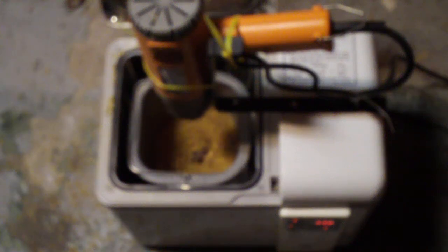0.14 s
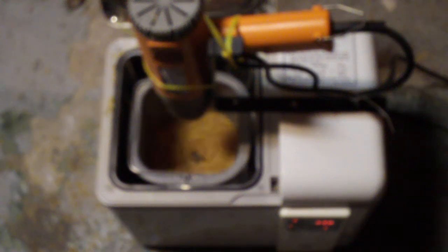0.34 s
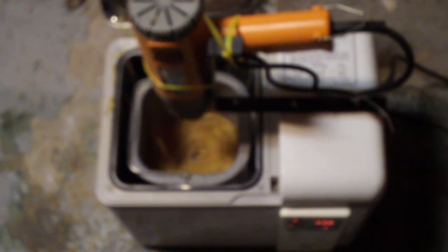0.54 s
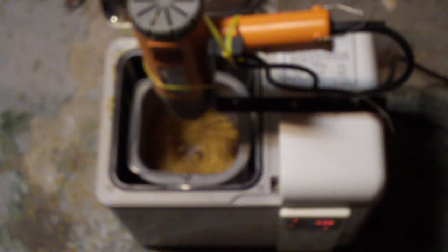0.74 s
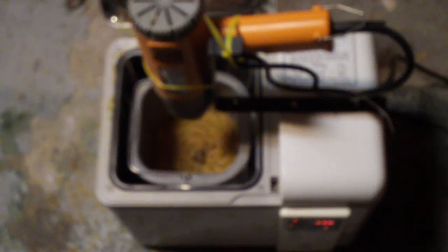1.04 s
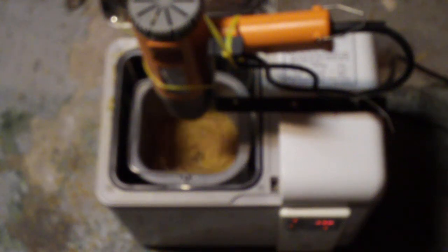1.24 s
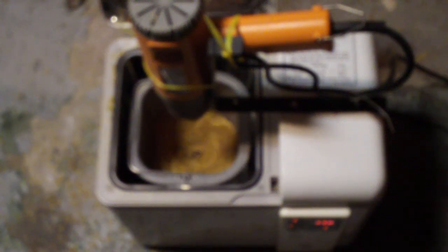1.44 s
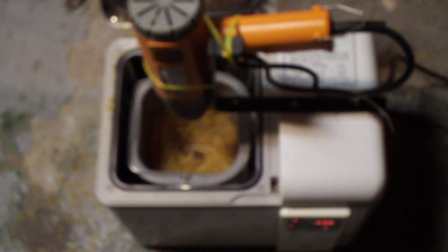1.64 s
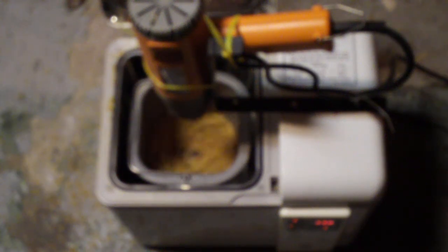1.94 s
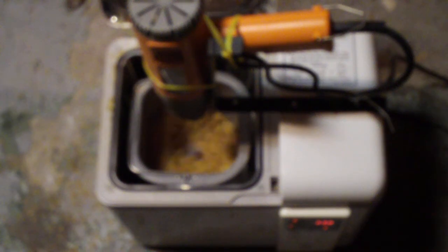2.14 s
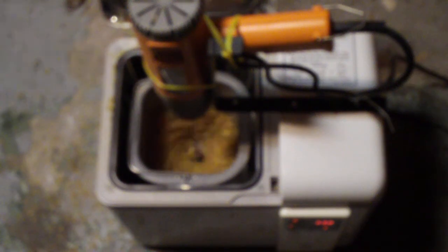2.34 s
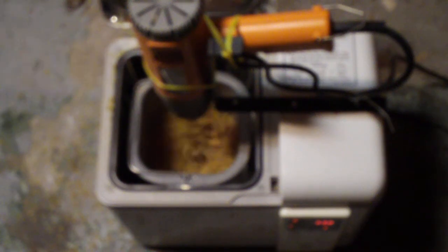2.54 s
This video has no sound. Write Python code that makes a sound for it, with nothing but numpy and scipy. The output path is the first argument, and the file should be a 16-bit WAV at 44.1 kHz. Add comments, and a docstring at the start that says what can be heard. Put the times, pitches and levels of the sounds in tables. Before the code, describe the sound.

Beans tumble in a metal pan without pause for about 2.7 seconds, a dense bright rattle with uneven surges several times a second. Harder knocks stand out near 0.55, 0.87, 1.7 and 2.3 seconds, among small metallic pings. Beneath, a heat gun blows a steady, slightly hollow rush with a fluttering high fan whine, over a faint low motor hum. Close, dry, centred sound.

```python
"""At the pan of a bread machine: a heat gun blows in while the paddle stirs a load of beans.
Beans rattle all the time and spill against the metal in quick uneven surges: random hits that ring.
Hard knocks are decaying noise bursts; stray hits ping the pan's modes.
The gun's air is coloured noise with hollow resonances, its fan a whine of fluttering harmonics.
The stirring motor hums at twice the mains rate and the octave above."""
import sys
import numpy as np
from scipy import signal
from scipy.fft import rfft, irfft
from scipy.io import wavfile

SR = 44100
rng = np.random.default_rng(int(sys.argv[2]) if len(sys.argv) > 2 else 0)


def wav_record(signal):
    """Record a signal, one row per channel, as 16-bit PCM in the file named by sys.argv[1]."""
    frames = np.transpose(np.atleast_2d(signal))
    bounded = np.clip(frames, -1, 1)
    # unit amplitude maps onto the largest positive 16-bit level
    quanta = np.round(bounded * 32767).astype(np.int16)
    wavfile.write(sys.argv[1], SR, quanta)


N = 119070

# Colour of beans on the pan. Each row: frequency in Hz, relative density in dB per Hz.
CLATTER_SPECTRUM = [(300, -22), (1000, -11), (1600, -3), (2800, -0.5), (3300, 1.5), (4100, 1), (4500, 5),
                    (4900, -5.5), (5400, 4), (5650, -6), (5900, 4.5), (6300, 0.5), (7200, 2), (9000, -5),
                    (15000, -40)]


def from_db(db):
    """Decibels to amplitude gain."""
    return 10 ** (np.asarray(db) / 20)


def rms_one(x):
    """Scale to unit rms."""
    return x / np.sqrt(np.mean(x ** 2) + 1e-20)


def in_time(rows):
    """Join (seconds, value) points by straight lines."""
    return np.interp(np.arange(N) / SR, *np.transpose(rows))


def drift(rate_hz):
    """Random wander of unit rms: noise low-passed to -6 dB at rate_hz."""
    hz = np.arange(N // 2 + 1) * SR / N
    spectrum = rfft(rng.standard_normal(N)) / (1 + (hz / rate_hz) ** 2)
    return rms_one(irfft(spectrum, N))


def coloured(x, spectrum):
    """Filter x by (Hz, dB) points joined over log frequency; unit rms."""
    hz, db = np.transpose(spectrum)
    bins_hz = np.maximum(np.arange(N // 2 + 1) * SR / N, 1)
    gain = from_db(np.interp(np.log(bins_hz), np.log(hz), db))
    return rms_one(irfft(rfft(x) * gain, N))


def blown(hz, width_hz):
    """Turbulence passed twice through one resonance; unit rms."""
    # each pass is wider by pi/2, so the pair is about width_hz wide at half power
    b, a = signal.iirpeak(hz, hz / (np.pi / 2 * width_hz), fs=SR)
    noise = rng.standard_normal(N + SR)
    resonant = signal.lfilter(b, a, signal.lfilter(b, a, noise))
    return rms_one(resonant[SR:])   # drop the build-up


def rattle(power, hits_per_s, spectrum):
    """Random bean hits, denser as the power rises, each ringing briefly in the pan."""
    hit_spread_db, pan_t60_s, pan_ring_db = 2.5, 0.035, -1
    born = rng.random(N) < hits_per_s * power / power.mean() / SR
    strength_db = hit_spread_db * np.minimum(rng.exponential(1, N), np.pi)
    hits = born * from_db(strength_db) * rng.choice([-1, 1], N)
    t = np.arange(SR // 10) / SR
    spots = 10
    dealt = rng.integers(0, spots, N)
    ringing = 0
    for spot in range(spots):   # every spot of the pan rings differently
        tail = rng.standard_normal(len(t)) * np.exp(-np.log(1000) * t / pan_t60_s)
        tail = tail / np.linalg.norm(tail)
        ringing = ringing + signal.fftconvolve(hits * (dealt == spot), tail)[:N]
    return np.sqrt(power.mean()) * coloured(hits + from_db(pan_ring_db) * ringing, spectrum)


def beans():
    """A steady tumble plus surges of hits that swell quickly and die away more slowly."""
    # Each row: peak in seconds, length in seconds, clatter and crackle in dB before the surge trims.
    surges = [(0.044, 0.036, -21, -21.5), (0.08, 0.022, -21, -23), (0.111, 0.024, -20.5, -18),
              (0.161, 0.016, -19.5, -19), (0.336, 0.013, -20, -13), (0.391, 0.011, -22, -27),
              (0.436, 0.029, -22, -22), (0.54, 0.025, -19.5, -23), (0.57, 0.014, -23, -24),
              (0.637, 0.023, -17, -19.5), (0.76, 0.023, -18, -19.5), (0.786, 0.02, -20.5, -37),
              (0.833, 0.025, -19.5, -20.5), (0.873, 0.014, -20, -22), (0.995, 0.021, -15.5, -27),
              (1.038, 0.019, -27.5, -20), (1.101, 0.032, -22, -25.5), (1.222, 0.014, -17, -27),
              (1.286, 0.016, -19.5, -18.5), (1.513, 0.015, -16, -24), (1.576, 0.02, -24.5, -16),
              (1.697, 0.022, -21, -20.5), (1.749, 0.028, -19.5, -17.5), (1.818, 0.014, -22, -19.5),
              (1.852, 0.023, -23.5, -21), (1.926, 0.023, -14.5, -25), (1.984, 0.023, -20, -23.5),
              (2.044, 0.034, -20, -19.5), (2.161, 0.03, -16.5, -23.5), (2.213, 0.024, -21, -19.5),
              (2.277, 0.018, -21, -22.5), (2.391, 0.016, -22, -21.5), (2.447, 0.039, -21, -22),
              (2.52, 0.022, -17, -25), (2.578, 0.018, -20, -34), (2.635, 0.022, -16, -27.5)]
    # Colour of beans on beans. Each row: frequency in Hz, relative density in dB per Hz.
    crackle_spectrum = [(2000, -37.5), (5500, -11.5), (7200, -6.5), (8700, 2), (9400, 1), (10200, 1),
                        (11200, -3), (12200, -3), (13500, -10.5), (15300, -16)]
    clatter_steady_db, clatter_trim_db, clatter_per_s = -24.5, -5, 4500
    crackle_steady_db, crackle_trim_db, crackle_per_s = -29, -4.5, 2800
    rise_share, fall_share = 0.45, 0.7   # of a surge's length
    t = np.arange(N) / SR
    tumble_db = 1.0 * drift(39)
    clatter = from_db(clatter_steady_db + tumble_db) ** 2
    crackle = from_db(crackle_steady_db + tumble_db) ** 2
    for peak_s, length_s, clatter_db, crackle_db in surges:
        side_s = length_s * np.where(t < peak_s, rise_share, fall_share)
        swell = np.exp(-((t - peak_s) / side_s) ** 2)
        clatter = clatter + swell * from_db(clatter_db + clatter_trim_db) ** 2
        crackle = crackle + swell * from_db(crackle_db + crackle_trim_db) ** 2
    return (rattle(clatter, clatter_per_s, CLATTER_SPECTRUM)
            + rattle(crackle, crackle_per_s, crackle_spectrum))


def knocks():
    """Single hard bean knocks: instant attack, then a short dense ring in the pan's colour."""
    # Each row: start in seconds, initial level in dB.
    knock_rows = [(0.336, -21), (0.5455, -16.5), (0.748, -21), (0.867, -15.5), (1.573, -23), (1.693, -13.5),
                  (1.915, -24), (2.277, -16.5)]
    t60_s = 0.073
    t = np.arange(N) / SR
    level = sum((t >= s) * from_db(db - 60 * np.abs(t - s) / t60_s) for s, db in knock_rows)
    return level * coloured(rng.standard_normal(N), CLATTER_SPECTRUM)


def pan_pings():
    """Stray beans strike each mode of the pan, a two-pole resonator, at moments of its own."""
    # Each row: mode in Hz, level in dB before the trim.
    pan_modes = [(3240, -44.5), (3440, -38.5), (3790, -41), (4410, -43), (4550, -38.5), (5300, -42.5),
                 (5830, -46), (5940, -42.5), (6480, -45), (6720, -39), (7750, -55), (8400, -43),
                 (8750, -40), (12050, -43)]
    pings_per_s, t60_s, trim_db = 45, 0.079, -1   # rate is per mode
    radius = np.exp(-np.log(1000) / (t60_s * SR))
    out = 0
    for hz, db in pan_modes:
        hits = (rng.random(N) < pings_per_s / SR) * rng.standard_normal(N)
        angle = 2 * np.pi * hz / SR
        poles = [1, -2 * radius * np.cos(angle), radius * radius]
        ring = signal.lfilter([1], poles, hits + 1e-18)
        out = out + from_db(db + trim_db) * rms_one(ring)
    return out


def air():
    """The jet's broad rush and the hollow resonances of nozzle and pan that it excites."""
    # Colour of the rush. Each row: frequency in Hz, relative density in dB per Hz.
    rush_spectrum = [(25, -3.5), (60, -8), (130, -7.5), (190, -10), (300, -8), (400, -2), (540, -2.5),
                     (680, -6), (790, -4), (950, -0.5), (1100, 2), (1230, -3.5), (1450, 1.5), (2200, -2),
                     (3400, 1.5), (5000, 0.5), (8000, -7), (12000, -7), (15300, -14.5)]
    # Steady resonances. Each row: frequency in Hz, width in Hz, level in dB.
    cavity = [(922, 30, -40.5), (1583, 120, -46), (2480, 39, -44.5), (3110, 45, -40)]
    # Strongest resonance, fading as the beans shift. Each row: time in seconds, level in dB.
    high_howl = [(0, -42), (.25, -35.5), (.6, -41.5), (1.05, -36), (1.4, -40), (1.9, -45), (2.7, -51)]
    # Lower resonance, varying as the beans shift. Each row: time in seconds, level in dB.
    low_howl = [(0, -45), (1.4, -43), (1.8, -37.5), (2.0, -44), (2.7, -47)]
    rush_db, flicker_db = -24, 0.97
    rush_gain = from_db(rush_db + flicker_db * drift(31))
    rush = rush_gain * coloured(rng.standard_normal(N), rush_spectrum)
    hollow = sum(from_db(db) * blown(hz, width_hz) for hz, width_hz, db in cavity)
    howls = from_db(in_time(high_howl)) * blown(839.5, 36)
    howls = howls + from_db(in_time(low_howl)) * blown(756.2, 12.2)
    return rush + hollow + howls


def fan():
    """Whine: fluttering harmonics of the fan's slightly unsteady speed."""
    # Each row: time in seconds, speed in turns per second before the wobble.
    fan_speed = [(0, 292.0), (1.0, 292.3), (1.9, 292.7), (2.7, 292.55)]
    # Each row: multiple of the speed, level in dB before trim and flutter.
    fan_orders = [(1, -49), (2, -41), (3, -40.5), (5, -48), (6, -38), (7, -44.5), (9, -47), (11, -44),
                  (12, -57), (13, -46), (18, -42), (20, -37.5), (21, -44), (22, -39), (23, -47),
                  (24, -38.5), (25, -42.5), (27, -60), (28, -37.5), (31, -53), (32, -64), (33, -51),
                  (36, -45), (38, -50), (40, -55), (42, -57), (44, -58), (47, -54), (48, -51), (50, -57),
                  (51, -53)]
    wobble_hz, flutter_db, trim_db = 0.26, 1, -1
    speed_hz = in_time(fan_speed) + wobble_hz * drift(8.3)
    turn = 2 * np.pi * np.cumsum(speed_hz) / SR
    whine = 0
    for order, db in fan_orders:
        gain = from_db(trim_db + db + flutter_db * drift(6.7))
        whine = whine + gain * np.sin(round(order) * turn + rng.uniform(0, 2 * np.pi))
    return np.sqrt(2) * whine   # sine levels are rms


def stirring_motor():
    """Steady mains hum: sines of fixed level and random phase."""
    # Each row: frequency in Hz, rms level in dB.
    hum = [(120, -47), (240, -57.5)]
    t = np.arange(N) / SR
    tones = sum(from_db(db) * np.sin(2 * np.pi * (hz * t + rng.random())) for hz, db in hum)
    return np.sqrt(2) * tones


def scene():
    """Everything reaches one microphone above the pan; both channels are alike."""
    mono = beans() + knocks() + pan_pings() + air() + fan() + stirring_motor()
    return np.tile(mono, (2, 1))


def record(dry):
    """Cut the top steeply with a linear-phase low-pass."""
    cutoff_hz = 15230
    lowpass = signal.firwin(601, cutoff_hz, fs=SR, window="blackman")
    return signal.fftconvolve(dry, lowpass[None], "same", axes=1)


dry = scene()
out = record(dry)
wav_record(out)
```